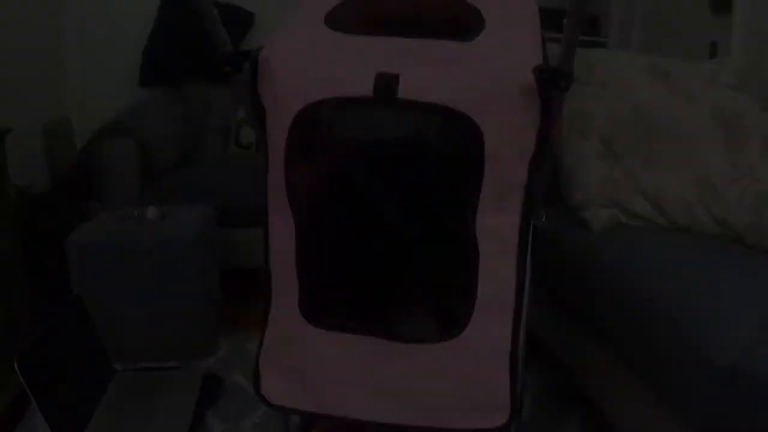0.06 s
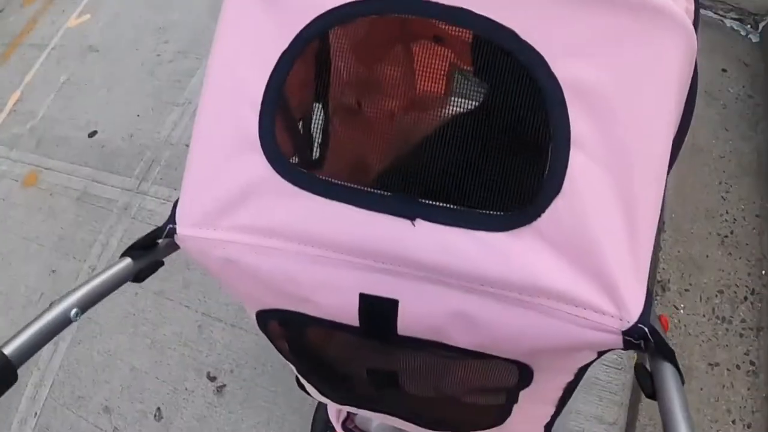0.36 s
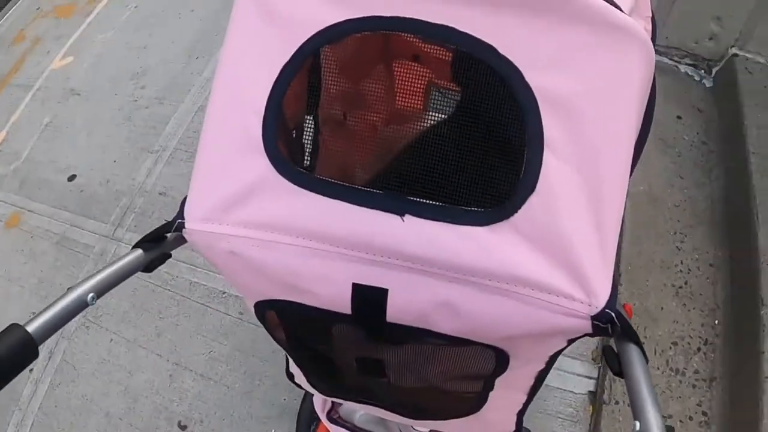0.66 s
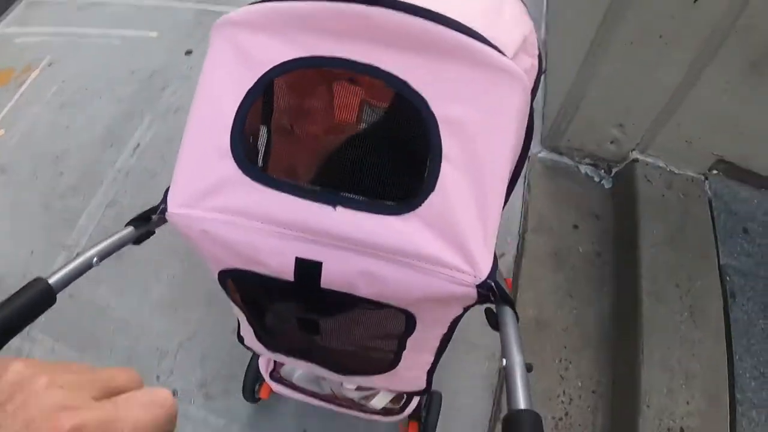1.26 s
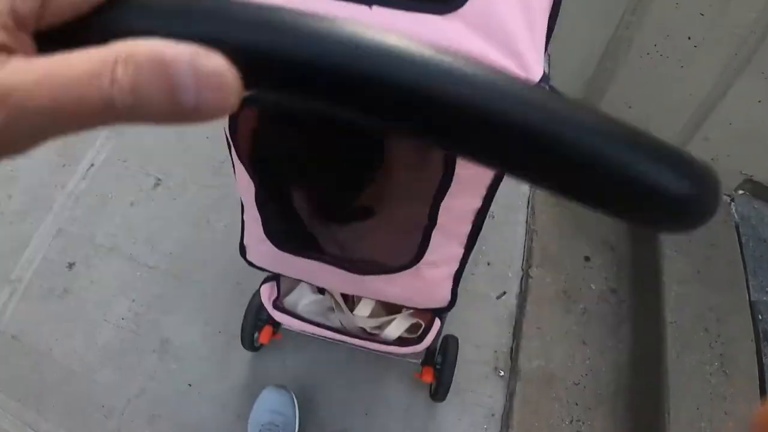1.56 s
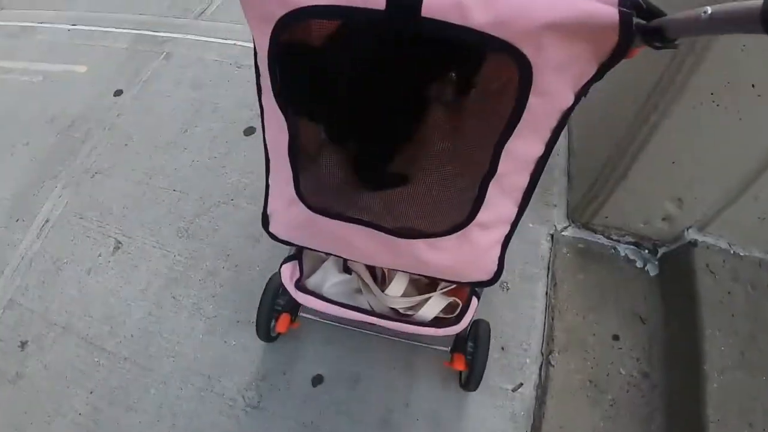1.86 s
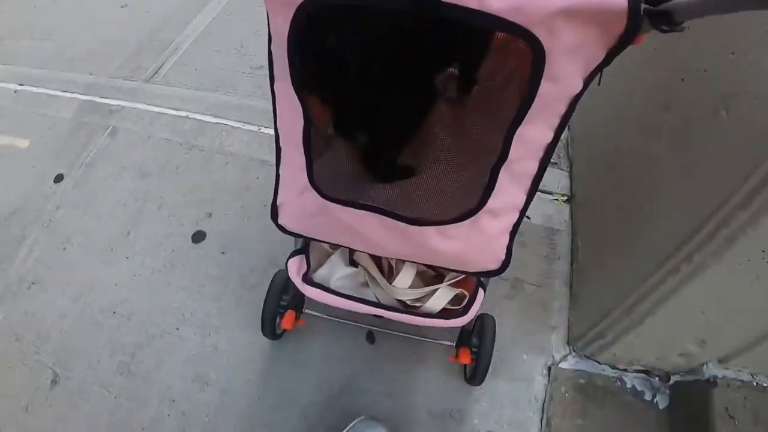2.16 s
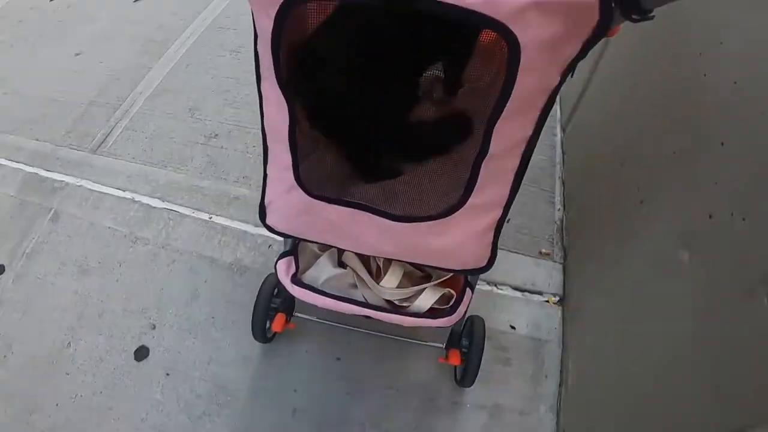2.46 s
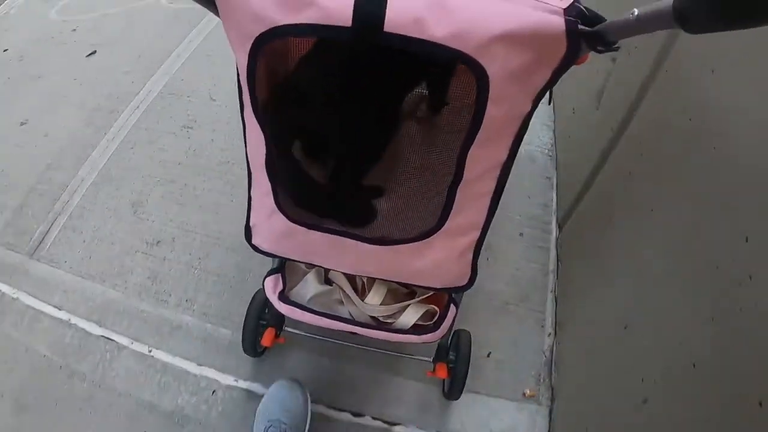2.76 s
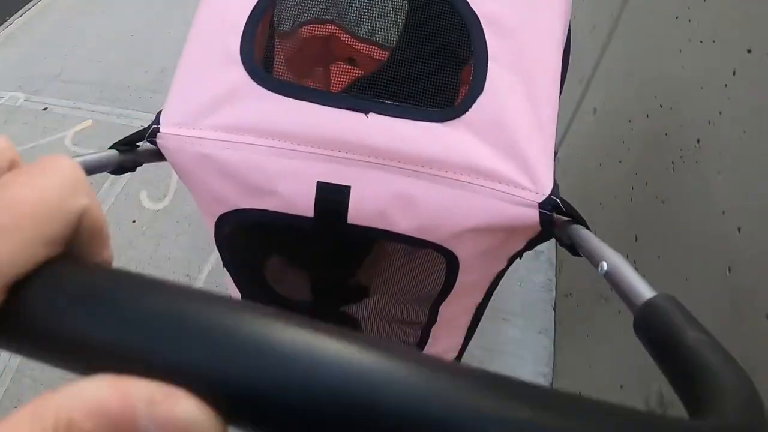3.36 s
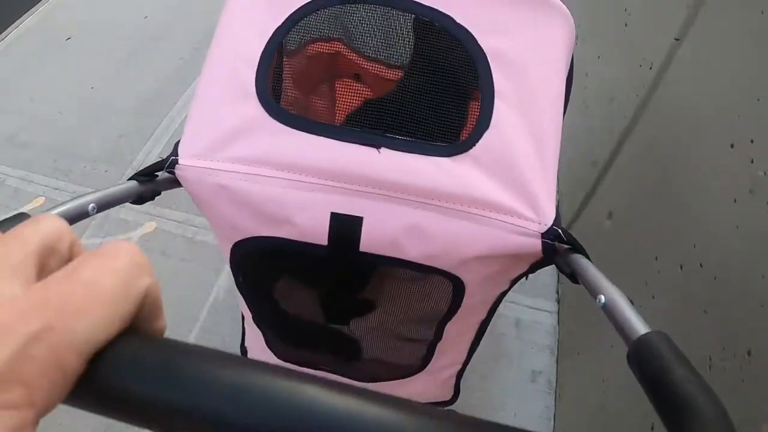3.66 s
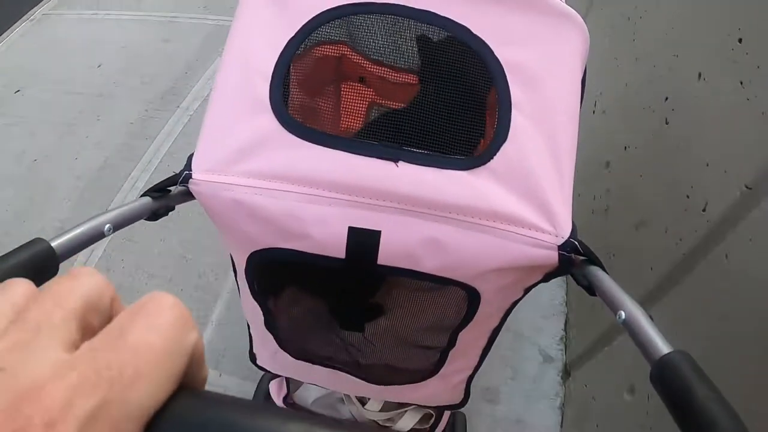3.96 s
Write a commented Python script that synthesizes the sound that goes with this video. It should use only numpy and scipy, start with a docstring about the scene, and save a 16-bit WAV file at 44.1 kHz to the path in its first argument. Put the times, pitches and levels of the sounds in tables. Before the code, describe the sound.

Stroller wheels roll over gritty concrete, then bump across slab joints with light rattles.

```python
"""A small stroller rolls along a concrete sidewalk, close to one mono microphone.
Its hard wheels rumble and shake the frame, the tyres rasp on grit, and the fabric rustles faintly,
with one thin tick. From halfway on the wheels thump over slab joints and scuff through sand,
and loose plastic fittings clatter. The scene opens indoors: a quiet room hum fades out,
and a moment of silence passes before the sidewalk fades in."""
import sys
import numpy as np
from scipy import signal
from scipy.fft import rfft, irfft, next_fast_len
from scipy.io import wavfile
from scipy.ndimage import uniform_filter1d, map_coordinates

SR = 44100
rng = np.random.default_rng(int(sys.argv[2]) if len(sys.argv) > 2 else 0)


def int16_out(signal):
    """Quantize to a 16-bit WAV file."""
    q = np.round(np.clip(np.atleast_2d(signal).T, -1, 1) * 32767)
    wavfile.write(sys.argv[1], SR, q.astype(np.int16))


N = 176400

# Indoor air, then its steady hum lines: (frequency [Hz], level [dB])
ROOM_SPECTRUM = [(15, -49), (25, -13), (65, -4), (92, -6.5), (326, -20.5), (401, -20.5), (482, -33),
                 (1660, -35.5), (1910, -41.5), (6000, -61), (8200, -63), (10000, -90), (13200, -120)]
HUM_LINES = [(60, -50.5), (183, -51.5), (1640, -70.5)]
# Noise colour of each source on the sidewalk: (frequency [Hz], level [dB])
FABRIC_SPECTRUM = [(4000, -20), (9000, 12), (13000, 4), (15500, -12)]
TICK_SPECTRUM = [(2500, -25), (5500, 3), (9500, 1.5), (11500, -8), (14500, -17), (16000, -33)]
SAND_SPECTRUM = [(1500, -18.5), (3000, 6), (4700, 4), (6000, -4.5), (7400, 1), (9000, -8), (10500, -28),
                 (16000, -50.5)]
FITTING_SPECTRUM = [(600, -34), (1400, -4.5), (2000, 3), (2600, -3.5), (3300, -3), (4200, -10),
                    (5200, -10.5), (6800, -9.5), (8000, -14), (9200, -12.5), (11000, -22), (16000, -51)]
THUD_SPECTRUM = [(50, -3), (120, 6.5), (300, 4.5), (650, -2), (1200, -20.5), (3000, -37), (8000, -63),
                 (16000, -100)]
GRIT_SPECTRUM = [(700, -19), (1800, 0.5), (2800, -1), (3600, -4.5), (5000, -12), (6300, -16.5),
                 (7600, -20.5), (9300, -28), (10500, -36.5), (13000, -45.5), (16000, -66.5)]
TYRE_SPECTRUM = [(200, -22), (480, -0.5), (750, 0.5), (1100, -3), (1500, -7.5), (2000, -15), (3200, -30.5),
                 (9000, -69), (16000, -100)]
FRAME_SPECTRUM = [(60, -32), (120, -4), (175, 2), (235, -2), (295, -4), (400, -5), (480, -9), (650, -18),
                  (1100, -28), (4000, -89), (12000, -120)]
RUMBLE_SPECTRUM = [(8, -13.5), (22, -4), (40, -0.5), (62, 2.5), (90, -6), (120, -5), (160, -13.5),
                   (300, -44), (900, -86)]
# Swells of fabric and of sand: (time [s], level [dB], half-width [s])
FABRIC_RUSTLES = [(1.555, -70, .006), (1.645, -73.5, .006), (1.70, -65, 0.019), (1.80, -77, 0.065),
                  (1.775, -67, .012), (1.792, -61.5, 0.0014), (1.88, -64, 0.0015), (1.935, -65.5, 0.045)]
SAND_SCUFFS = [(2.44, -52, 0.044), (2.585, -49.5, 0.017), (2.875, -52, 0.028), (2.96, -50, .025),
               (3.03, -50, 0.014), (3.10, -51.5, 0.018), (3.60, -55.5, 0.014), (3.655, -47.5, 0.015),
               (3.728, -43, 0.014), (3.885, -55, 0.026)]
# Fittings striking: (time [s], level [dB], attack [s], t60 [s], centre [Hz], sharpness [Q])
FITTING_CONTACTS = [(2.277, -31, 0.0035, 0.11, 5000, 1.7), (2.283, -33, 0.0017, 0.054, 1790, 2),
                    (2.292, -34, 0.0015, 0.18, 4300, 1.3), (2.304, -38, .003, 0.13, 3900, 1.8),
                    (2.371, -27, 0.0014, 0.04, 3000, 1), (2.401, -37, 0.00074, 0.041, 2970, 1),
                    (2.426, -34, 0.0033, 0.078, 2580, 2.5), (2.454, -35, 0.0011, 0.035, 3400, .8),
                    (2.520, -27.5, 0.00089, 0.036, 2780, 3.7), (2.571, -43, 0.002, 0.031, 8650, 6.5),
                    (2.58, -35, .001, 0.026, 2800, 1.1), (2.842, -29, 0.0012, 0.072, 3670, 1.4),
                    (2.864, -44, .002, 0.17, 5000, 1.9), (2.947, -32.5, 0.0023, 0.057, 2750, 1.5),
                    (2.999, -34, .001, 0.036, 2300, 1.2), (3.032, -31.5, 0.0007, 0.018, 3200, 0.9),
                    (3.323, -32.5, 0.0028, 0.058, 2350, 3.6), (3.430, -25, 0.00058, 0.023, 2650, 0.91),
                    (3.483, -31, 0.00092, 0.029, 4340, 4.8), (3.484, -29, 0.00091, 0.032, 2300, 1.8),
                    (3.561, -37, .001, 0.03, 2900, 2), (3.588, -33, 0.00091, 0.041, 3550, 1.3),
                    (3.645, -36, 0.0012, 0.11, 3040, 1.6), (3.714, -33, 0.0015, 0.096, 1990, 1.4),
                    (3.733, -39, 0.0011, 0.037, 5450, 0.94), (3.855, -39, .001, .04, 3480, 1.1)]
# Ring of the fittings: (frequency [Hz], level [dB], t60 [multiple of the contact's])
FITTING_RING = [(1765, -1.5, 1.1), (2313, -3.5, 1.3), (2516, -4, 1.4), (2740, -2, 0.87), (3580, -16, 1.2),
                (3990, -9, 1.9), (4050, -8.5, 0.78), (4400, -9, 1.1), (5033, -6, 0.6), (5380, -11, 1.1),
                (6470, -10.5, 0.91)]
# Wheels meeting slab joints: (time [s], level [dB], relative level of the hard knock [dB])
JOINT_HITS = [(1.924, -15.5, -7), (1.943, -11.5, -8), (1.953, -13.5, -5), (1.972, -23, -10),
              (1.986, -15.5, -21), (2.004, -14, 2), (2.024, -21.5, 0), (2.05, -23, -5), (2.074, -15, -5),
              (2.084, -19, 8), (2.179, -17, -9), (2.279, -15.5, -3), (2.486, -18, -2), (2.558, -14.5, -3.5),
              (2.578, -26.5, 11.5), (2.616, -15.5, -11), (2.672, -16.5, -16), (2.815, -25, -15),
              (2.851, -17.5, -8), (2.994, -24.5, -7), (3.021, -16, 0), (3.045, -22.5, 6), (3.088, -15, 0.5),
              (3.101, -26, 7), (3.13, -28, 7)]
# Ring of the struck frame: (frequency [Hz], level [dB], t60 [s])
FRAME_RING = [(105, -1.5, 0.13), (154.4, 0, 0.077), (243, -3.5, 0.075), (298, -9, 0.063), (374, -12, 0.12),
              (466, -15, 0.019), (720, -24, 0.06)]
# Wheels and frame tubes kept ringing by the ground: (frequency [Hz], width [Hz], relative level [dB])
WHEEL_MODES = [(2780, 95, -10), (3190, 190, -15.5), (4265, 180, -20.5), (4960, 240, -24)]
TUBE_MODES = [(288.3, 28.5, -9), (531.1, 15, -17), (888, 7.5, -28.5)]
# Rolling layers along the sidewalk, before any trim or flutter: (time [s], level [dB])
GRIT_LEVELS = [(.54, -50.5), (.85, -47.5), (1.3, -45.5), (1.8, -47), (2.25, -45.5), (2.42, -42.5),
               (2.75, -46.5), (2.93, -41), (3.2, -44.5), (3.5, -42), (3.7, -41), (4, -43.5)]
TYRE_LEVELS = [(0.54, -40.5), (0.56, -37.5), (1.18, -35.5), (1.95, -37.5), (2.01, -37), (2.2, -37.5),
               (3.02, -37.5), (3.04, -34.5), (3.24, -38), (4.0, -33)]
BOUNCE_LEVELS = [(.54, -31), (1.88, -32.5), (1.97, -30), (2.2, -29), (2.62, -21), (2.8, -30), (3.05, -23.5),
                 (3.2, -29), (3.35, -25.5), (3.65, -36.5), (4, -40)]
FRAME_LEVELS = [(.54, -29), (.65, -27.5), (1.0, -25.5), (1.3, -26), (1.9, -27.5), (2.0, -24), (2.15, -27),
                (2.45, -29.5), (2.6, -29), (2.95, -34), (3.08, -29.5), (3.2, -31), (3.58, -31.5),
                (4, -26.5)]
RUMBLE_LEVELS = [(.54, -24.5), (.6, -36.5), (.68, -22), (1.1, -22.5), (1.3, -27), (1.5, -27), (1.88, -24),
                 (1.95, -25.5), (2.2, -22.5), (2.6, -23.5), (2.9, -21), (3.08, -21.5), (3.18, -26.5),
                 (3.33, -25.5), (3.57, -23.5), (3.7, -24.5), (4, -24.5)]


def amp(db):
    """Decibels to gain."""
    return 10 ** (np.asarray(db) / 20)


def unit(x):
    """Scale to rms 1."""
    return x / np.sqrt(np.mean(x ** 2) + 1e-20)


def curve(rows):
    """(time, value) points as one value per sample."""
    return np.interp(np.arange(N) / SR, *np.transpose(rows))


def swells(rows):
    """Bell-shaped envelopes from (time [s], level [dB], half-width [s])."""
    t = np.arange(N) / SR
    return sum(amp(db) * np.exp(-((t - s) / width) ** 2 / 2) for s, db, width in rows)


def wobble(rate):
    """A smooth random curve, rate knots a second."""
    return map_coordinates(rng.standard_normal(N // 20), [np.arange(N) * rate / SR], mode="wrap")


def filtered(x, response):
    """x times a response of frequency."""
    m = next_fast_len(N + SR // 2)
    return irfft(rfft(x, m) * response(np.fft.rfftfreq(m, 1 / SR)), m)[:N]


def coloured(x, points):
    """x shaped by (frequency [Hz], level [dB]) points, at rms 1."""
    hz, db = np.transpose(points)
    return unit(filtered(x, lambda f: amp(np.interp(np.log(f + 1), np.log(hz), db))))


def noise(points):
    """Coloured noise of rms 1."""
    return coloured(rng.standard_normal(N), points)


def sine(hz, t):
    """A sine of random phase."""
    return np.sin(2 * np.pi * (hz * t + rng.random()))


def resonance(f, hz, width):
    """Response at f of one resonance."""
    return 1j * f * width / (hz * hz - f * f + 1j * f * width)


def ringing(spectrum, modes):
    """Resonances, each driven by its own coloured noise."""
    return sum(amp(db) * unit(filtered(noise(spectrum), lambda f: resonance(f, hz, width) ** 2))
               for hz, width, db in modes)


def steady(x, evenness, window_s=0.024):
    """x with its chance swells partly evened out, at rms 1."""
    power = np.abs(uniform_filter1d(x * x, int(window_s * SR))) + 1e-9
    return unit(x / power ** (evenness / 2))


def add(out, s, x):
    """Mix x into out from time s."""
    part = out[round(s * SR):][:len(x)]
    part += x[:len(part)]


def room_tone(air_db=-47.5, fade_from_s=0.016, silent_s=0.23):
    """Indoors: hum and air around the microphone, fading to silence."""
    t = np.arange(N) / SR
    hum = sum(amp(db) * np.sqrt(2) * sine(hz, t) for hz, db in HUM_LINES)
    air = amp(air_db) * noise(ROOM_SPECTRUM)
    return (hum + air) * np.clip((silent_s - t) / (silent_s - fade_from_s), 0, 1)


def fabric(crinkle_db=3, tick_s=1.698, tick_db=-40.5, tick_t60_s=0.037):
    """The fabric gives faint high rustles, with one thin tick among them."""
    t = np.arange(N) / SR
    crinkle = unit(noise(FABRIC_SPECTRUM) * amp(crinkle_db * wobble(250)))
    out = crinkle * swells(FABRIC_RUSTLES)
    tick = noise(TICK_SPECTRUM) * amp(tick_db - 60 * t / tick_t60_s)
    add(out, tick_s, tick[:SR // 10])
    return out


def sand_scuffs(cracks_per_s=260, spread_db=0.5, t60_s=0.02):
    """Loose sand cracks under the wheels in clumps of grains."""
    t = np.arange(SR // 50) / SR
    cracks = rng.random(N) < cracks_per_s / SR
    strength = amp(spread_db * np.minimum(rng.exponential(size=N), 2))
    decays = signal.fftconvolve(cracks * strength, amp(-60 * t / t60_s))[:N]
    return coloured(decays * rng.standard_normal(N), SAND_SPECTRUM) * swells(SAND_SCUFFS)


def grit(grains_per_s=700, spread_db=0.5, grain_db=-5, flutter_db=1.2, trim_db=-0.08):
    """Single grains are crushed within a hiss of grit that keeps the wheels ringing."""
    grains = (rng.random(N) < grains_per_s / SR) * rng.choice([-1, 1], N)
    strength = amp(spread_db * np.minimum(rng.exponential(size=N), 3))
    crunch = coloured(rng.standard_normal(N) + amp(grain_db) * unit(grains * strength), GRIT_SPECTRUM)
    wheels = ringing(GRIT_SPECTRUM, WHEEL_MODES)
    return (crunch + wheels) * amp(curve(GRIT_LEVELS) + trim_db + flutter_db * wobble(70))


def fitting_clatter(rough_db=4, detune=0.0019):
    """Loose fittings chatter in rough bursts; each contact favours the modes near its own centre."""
    out, t = np.zeros(N), np.arange(SR // 3) / SR
    chatter = noise(FITTING_SPECTRUM) * amp(rough_db * wobble(450))
    for s, db, attack, t60, centre_hz, q in FITTING_CONTACTS:
        contact = lambda f: np.abs(resonance(f, centre_hz, centre_hz / q)) ** 2
        band = steady(filtered(chatter, contact), evenness=0.64, window_s=0.014)
        burst = band[rng.integers(N - len(t)):][:len(t)] * amp(-60 * t / t60)
        ring = 0
        for hz, level, t60_ratio in FITTING_RING:
            decay = amp(level + rng.normal(0, 0.98) - 60 * t / (t60 * t60_ratio))
            ring += contact(hz) * decay * sine(hz * rng.normal(1, detune), t)
        add(out, s, amp(db) * (burst + ring) * (1 - np.exp(-t / attack)))
    return out


def joint_thumps(attack_s=0.0026, thud_t60_s=0.041, push_hz=396, push_db=2.5, push_t60_s=0.014):
    """Each slab joint gives a short push and a dull thud, and rings the frame briefly."""
    out, t = np.zeros(N), np.arange(SR // 3) / SR
    for s, db, knock_db in JOINT_HITS:
        ring = 0
        for hz, level, t60 in FRAME_RING:
            decay = amp(level + rng.normal(0, 3.7) - 60 * t / t60)
            ring += decay * sine(hz * rng.normal(1, 0.029), t)
        thud = steady(noise(THUD_SPECTRUM), evenness=0.99, window_s=0.0089)[:len(t)]
        thud *= amp(knock_db - 60 * t / thud_t60_s)
        push = np.sin(2 * np.pi * push_hz * rng.normal(1, 0.12) * t)
        push *= amp(knock_db + push_db - 60 * t / push_t60_s)
        add(out, s, amp(db) * (ring + thud + push) * (1 - np.exp(-t / attack_s)))
    return out


def tyre_rasp(shake, shake_db=0.5, trim_db=0.88):
    """The tyres rasp on the ground, wavering with its shake."""
    return noise(TYRE_SPECTRUM) * amp(curve(TYRE_LEVELS) + trim_db + shake_db * shake)


def carriage_bounce(hz=92.6, width_hz=75):
    """The carriage bounces on its wheels at one broad, low resonance."""
    sprung = filtered(rng.standard_normal(N), lambda f: resonance(f, hz, width_hz) ** 2)
    return steady(sprung, evenness=0.42) * amp(curve(BOUNCE_LEVELS))


def frame_shudder(shake, shake_db=2, trim_db=0.45):
    """The ground shakes the frame and keeps its tubes ringing."""
    frame = steady(noise(FRAME_SPECTRUM) + ringing(FRAME_SPECTRUM, TUBE_MODES), evenness=0.24)
    return frame * amp(curve(FRAME_LEVELS) + trim_db + shake_db * shake)


def wheel_rumble(trim_db=0.42):
    """Hard wheels rumble over the concrete, close by."""
    return steady(noise(RUMBLE_SPECTRUM), evenness=0.38) * amp(curve(RUMBLE_LEVELS) + trim_db)


def scene(sidewalk_s=0.4635, fade_s=0.068):
    """Two places: the room first, then the sidewalk fades in."""
    shake = wobble(55)  # uneven concrete shakes tyres and frame together
    rolling = wheel_rumble() + carriage_bounce() + frame_shudder(shake) + tyre_rasp(shake) + grit()
    stroller = rolling + joint_thumps() + fitting_clatter() + fabric() + sand_scuffs()
    fade_in = np.clip((np.arange(N) / SR - sidewalk_s) / fade_s, 0, 1) ** 1.97
    return (room_tone() + fade_in * stroller)[None]


def record(dry):
    """The camera's mono microphone channel passes nothing above its band limit."""
    top_hz = 15700
    return filtered(dry[0], lambda hz: hz < top_hz)[None]


dry = scene()
out = record(dry)
int16_out(out)
```